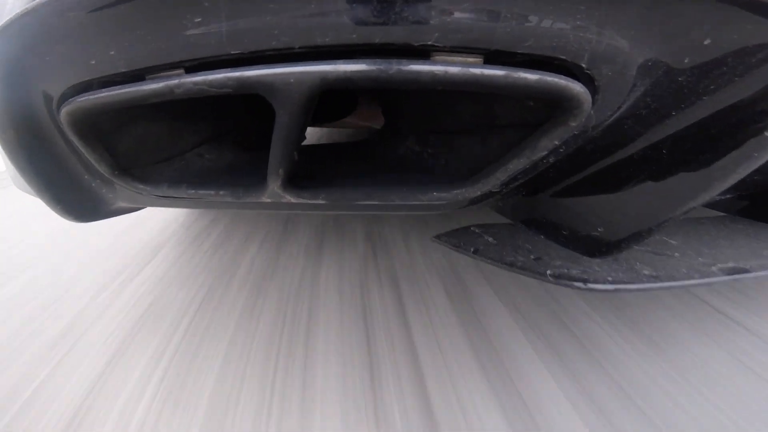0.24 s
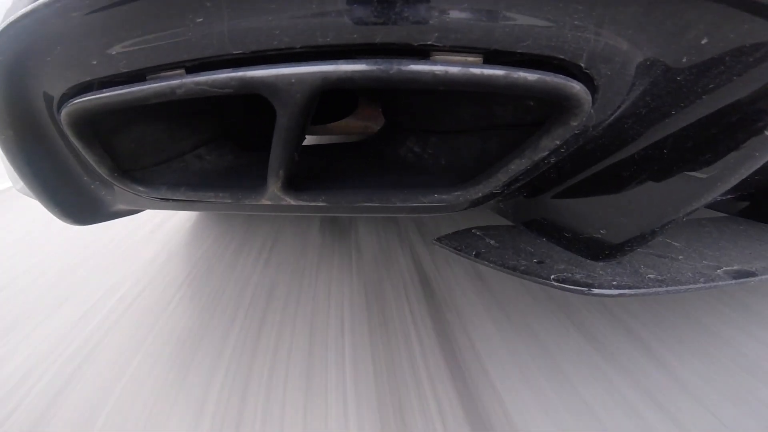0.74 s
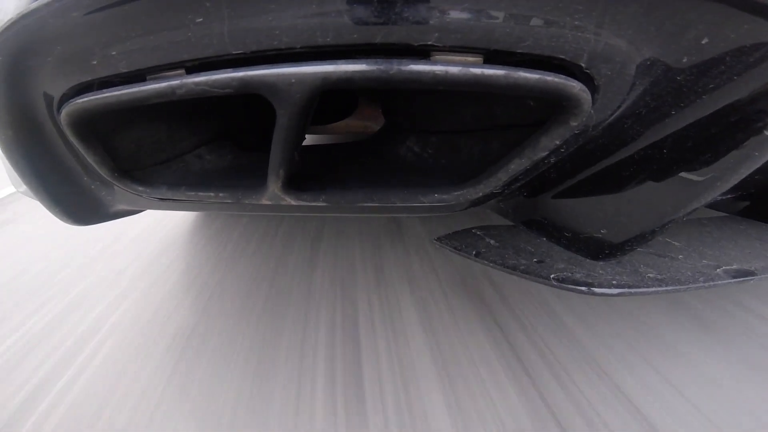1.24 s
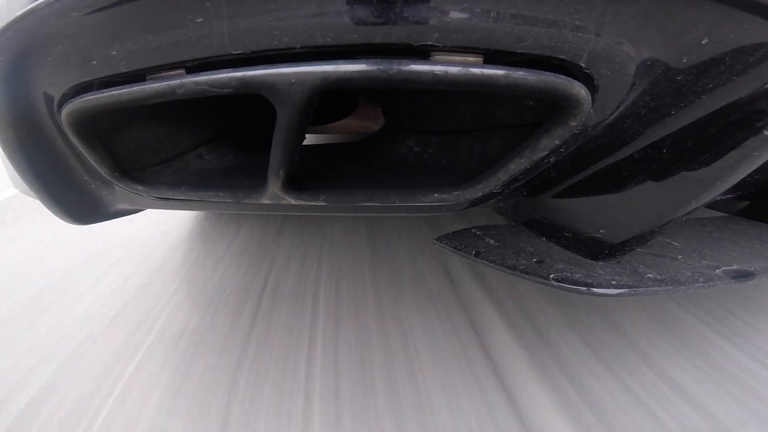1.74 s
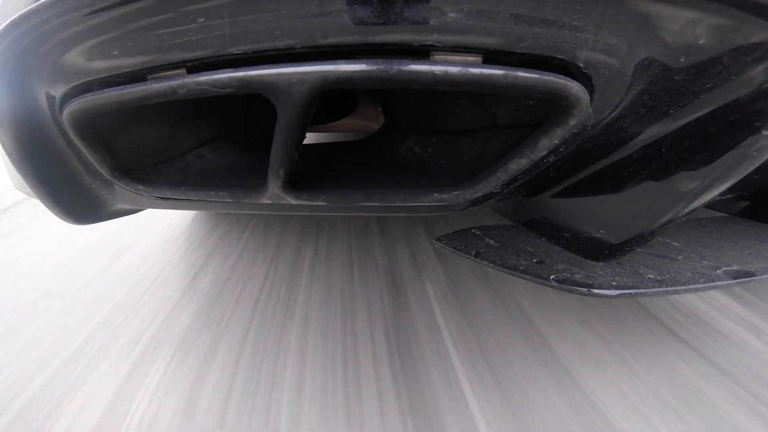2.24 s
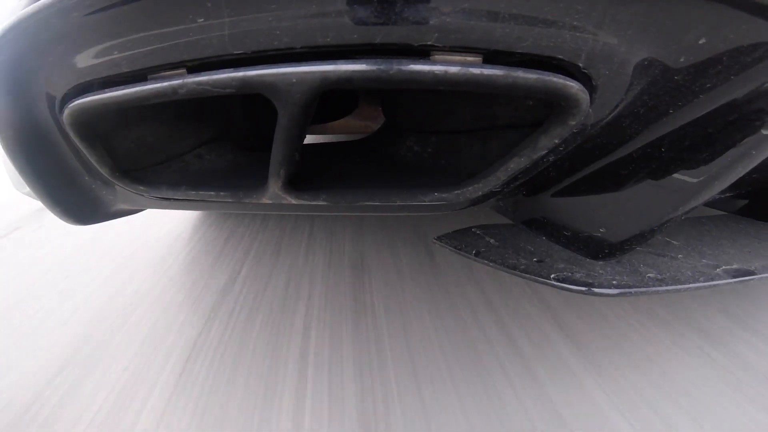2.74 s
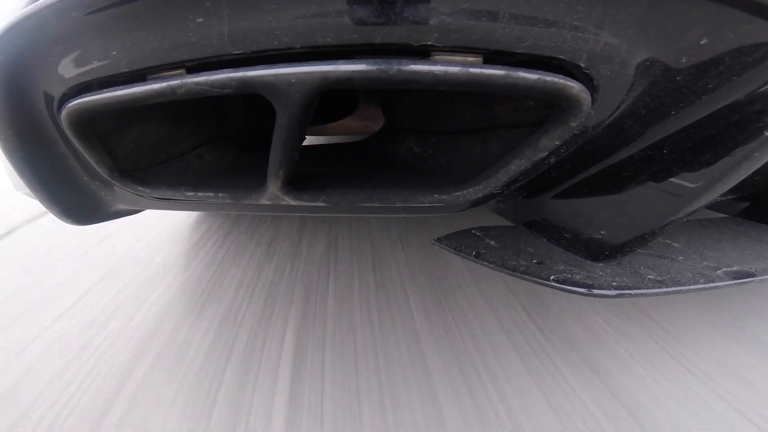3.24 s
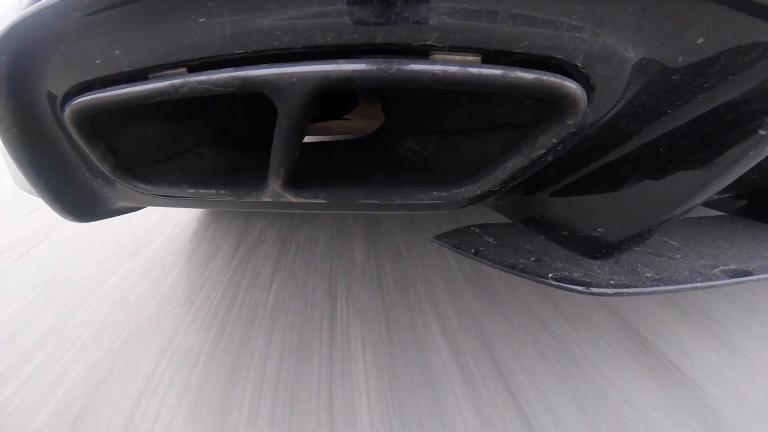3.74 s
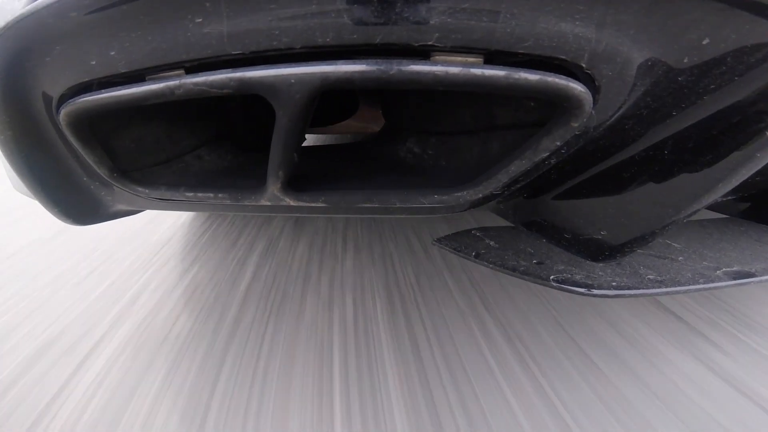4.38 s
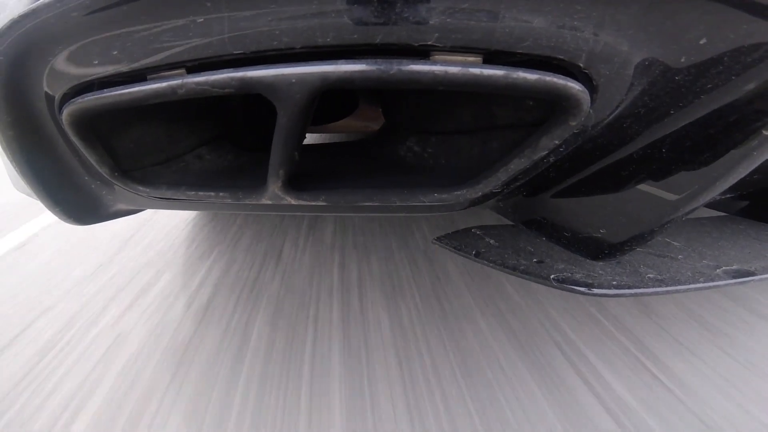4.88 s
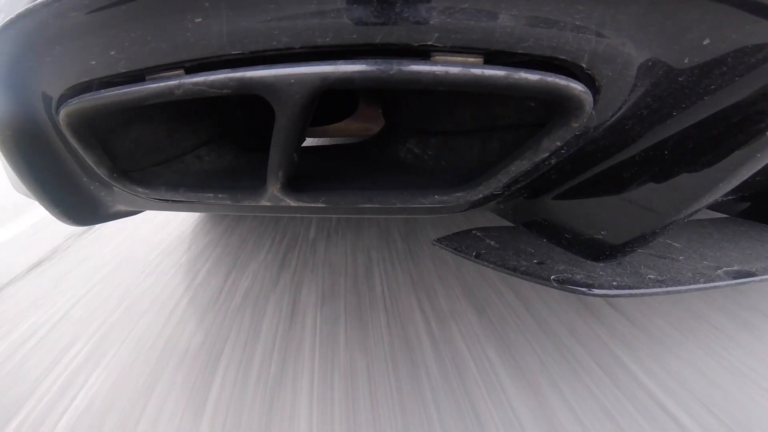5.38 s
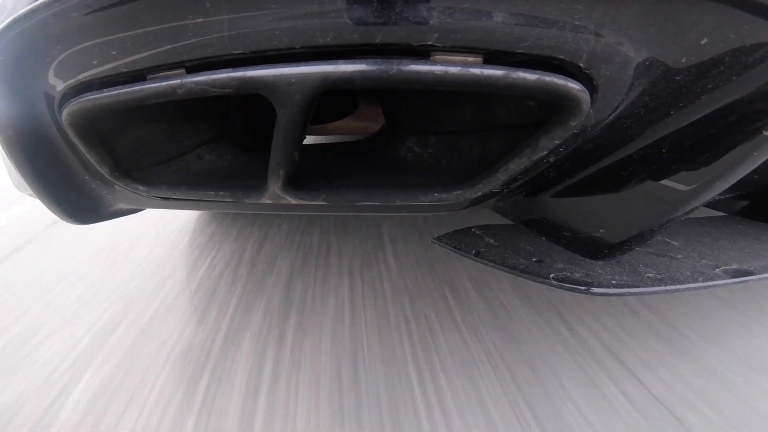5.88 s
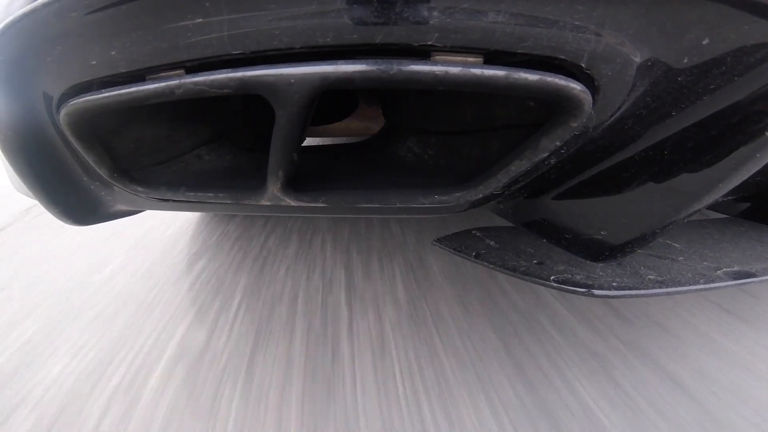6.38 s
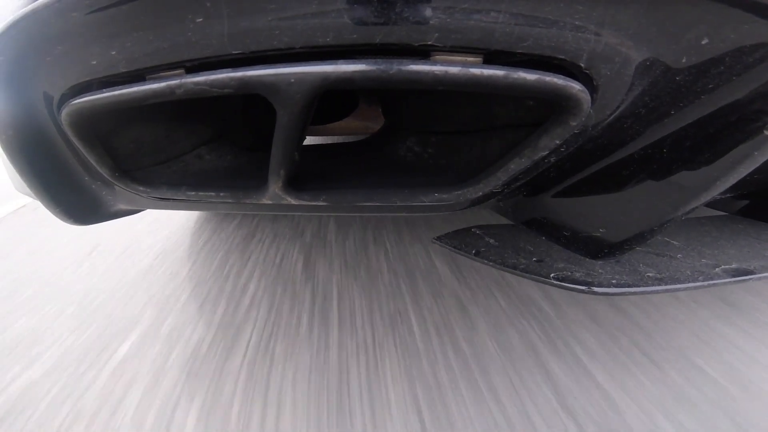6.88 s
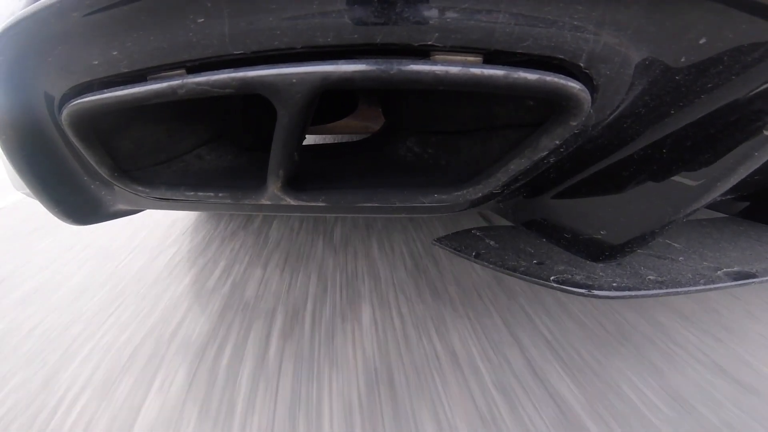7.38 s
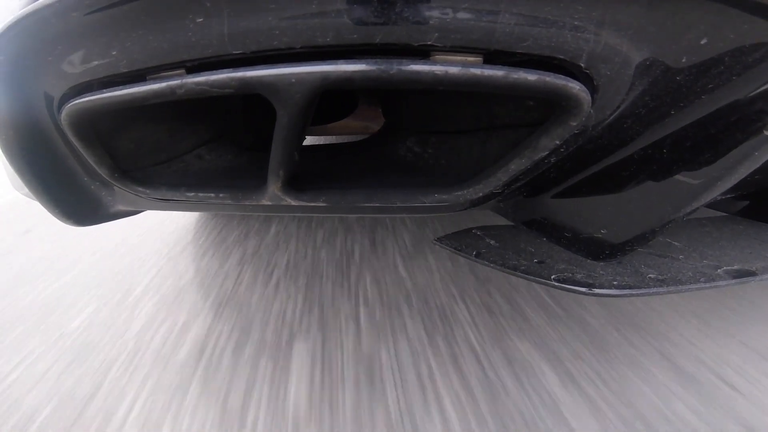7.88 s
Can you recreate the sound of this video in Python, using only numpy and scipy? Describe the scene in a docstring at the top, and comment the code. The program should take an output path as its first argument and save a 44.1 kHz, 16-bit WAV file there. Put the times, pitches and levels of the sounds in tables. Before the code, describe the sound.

A microphone on the car's rear, outdoors on the road, catches rapid exhaust crackles and bangs in the first quarter second, a brief throttle swell, then irregular muffled backfires. After that the exhaust settles into a steady resonant drone with breathy roar, strongest in the middle, its revs falling smoothly into a deep boom. Wind buffeting, soft underbody thuds and a few tiny grit ticks surround it.

```python
"""The exhaust note of a moving car, heard close behind its tailpipes, is a sum of engine orders in resonance.
Stabs of throttle open the scene: rasping pulse trains that crackle and cut off.
Unburnt fuel pops in the hot exhaust as shock trains that set damped modes ringing.
The revs then sink slowly, sliding the orders through the pipe's standing waves.
Filtered noise makes the gas roar, wind and tyres; thuds, hollow hum and ticks of grit lie around them."""
import sys
import numpy as np
from scipy import signal
from scipy.fft import rfft, irfft, next_fast_len
from scipy.io import wavfile

SR = 44100
rng = np.random.default_rng(int(sys.argv[2]) if len(sys.argv) > 2 else 0)


def inscribe(sig):
    """Save sig as 16-bit PCM at rate SR to the path in sys.argv[1].

    A 1-D sig is mono; a 2-D sig holds one channel per row.
    Samples are clipped to [-1, 1] before scaling.
    """
    pcm = np.round(np.clip(np.atleast_2d(sig).T, -1, 1) * 32767)
    wavfile.write(sys.argv[1], SR, pcm.astype(np.int16))


N = 358091
TIME = np.arange(N) / SR
FFT_SIZE = next_fast_len(N, True)
BINS = np.fft.rfftfreq(FFT_SIZE, 1 / SR)  # Hz


def amp(db):
    """Decibel law: 20 dB is a factor of ten in amplitude."""
    return 10 ** (np.asarray(db) / 20)


def unit(x):
    """Normalisation: scales a signal to rms 1."""
    return x / np.sqrt(np.mean(x ** 2) + 1e-20)


def curve(rows):
    """Linear interpolation: joins a table by straight lines in time."""
    return np.interp(TIME, *np.transpose(rows))


def read(points, hz):
    """Interpolation over log frequency: gain at the given frequencies from a short spectrum in dB."""
    at, db = np.transpose(points)
    return amp(np.interp(np.log(hz + 1), np.log(at), db))


def colour(x, gain):
    """Linear filtering: multiplies the spectrum by a gain per frequency, then scales to rms 1."""
    return unit(irfft(rfft(x, FFT_SIZE) * gain, FFT_SIZE)[:N])


def noise():
    """White noise: equal mean power at every frequency."""
    return rng.standard_normal(N)


def drift(rate_hz):
    """Slow random modulation: noise of rms 1 whose spectrum falls as a Gaussian in frequency."""
    return colour(noise(), np.exp(-(BINS / rate_hz) ** 2))


def puffs(turns, depth):
    """Amplitude modulation: turbulence that surges with each firing."""
    return noise() * (1 + depth * np.cos(2 * np.pi * turns))


def swells(rows):
    """Smooth envelopes: each row swells about its middle and fades."""
    return sum(amp(db) * np.exp(-abs((TIME - middle) / half) ** 3) for middle, half, db in rows)


def modes(table, t):
    """Modal decay: sines that each fall 60 dB in their t60."""
    return sum(amp(db - 60 * t / t60) * np.sin(2 * np.pi * hz * t) for hz, db, t60 in table)


def swing(t, hz, cycles=0.44, onset_cycles=0.088):
    """Damped oscillation: a slug of gas swings in and out a time or two."""
    turns = hz * t
    onset = 1 - np.exp(-(turns / onset_cycles) ** 2)
    return -np.sin(2 * np.pi * turns) * np.exp(-turns / cycles) * onset


def bell(x, hz, width_hz, db):
    """Resonant equalisation: raises or lowers one band of a sound."""
    numerator, denominator = signal.iirpeak(hz, hz / width_hz, fs=SR)
    return x + (amp(db) - 1) * signal.lfilter(numerator, denominator, x)


def add(mix, s, sound):
    """Superposition: mixes a sound in at time s."""
    part = mix[max(round(s * SR), 0):][:len(sound)]
    part += sound[:len(part)]


# Air buffeting the mount. Each row: time in seconds, level in dB before the common lift and gusts.
WIND = [(0, -21), (.17, -54), (.4, -35.5), (.6, -56), (.94, -33.5), (1.03, -48), (1.3, -40.5), (1.65, -45),
        (2.15, -36), (2.5, -36.5), (2.75, -40), (3.3, -44.5), (3.55, -33.5), (4.3, -34.5), (5.7, -32),
        (6.3, -34.5), (8.12, -37.5)]
# Spectrum of the wind. Each row: frequency in Hz, relative gain in dB.
BUFFET_SPECTRUM = [(10, -15), (25, -1.5), (45, -3), (80, -3), (130, -10.5), (250, -17.5), (600, -45.5),
                   (2000, -92)]
# Spectrum of the tyre wash. Each row: frequency in Hz, relative gain in dB.
TYRE_SPECTRUM = [(20, -4.5), (60, 1.5), (200, -18), (500, -18.5), (1000, -20.5), (2000, -31.5), (3000, -35),
                 (4000, -50), (6000, -57.5), (9000, -72), (16000, -80)]


def road(wind_lift_db=6.0, tyres_db=-45):
    """Broadband turbulence: lumpy wind under the bumper over the steady wash of the tyres."""
    gusts_db = 1.6 * drift(10)
    wind_level = amp(curve(WIND) + wind_lift_db + gusts_db)
    wind = wind_level * colour(noise(), read(BUFFET_SPECTRUM, BINS))
    return wind + amp(tyres_db) * colour(noise(), read(TYRE_SPECTRUM, BINS))


# Hum stirred up under the car. Each row: time in seconds, level in dB.
HOLLOW = [(0, -60), (.7, -60.5), (2, -48), (4, -46.5), (5.2, -35.5), (6.3, -37), (7.2, -41.5),
          (8.12, -45.5)]


def hollow(hz=213, width_hz=24):
    """Resonance: turbulence rings one low mode as a hollow hum."""
    resonance = 1 / (1 + (2 * (BINS - hz) / width_hz) ** 2)
    return amp(curve(HOLLOW)) * colour(noise(), resonance)


# Ticks of grit on the bodywork. Each row: time in seconds, level in dB before the low-pass filter.
GRIT = [(0.0386, -29), (1.022, -47), (1.031, -44), (2.9640, -38), (3.5100, -39), (6.7182, -31.5),
        (6.7265, -24.5)]


def grit(decay_s=0.00012, top_hz=7800):
    """Impulsive excitation: tiny dry ticks that decay with no ring."""
    out, t = np.zeros(N), np.arange(SR // 100) / SR
    low_pass = signal.butter(6, min(top_hz, SR / 3), fs=SR, output="sos")
    tick = signal.sosfilt(low_pass, np.exp(-t / decay_s))
    for s, db in GRIT:
        add(out, s, amp(db) * tick)
    return out


# Soft low thuds under the car. Each row: start in seconds, level in dB, swing rate in Hz.
THUDS = [(0.708, -25.5, 70), (0.778, -14, 85), (0.993, -29, 55), (1.683, -17, 80), (2.53, -15, 69.5),
         (2.834, -17, 110), (3.888, -18, 109), (4.179, -21, 45.2), (4.346, -16, 39.7)]


def thuds():
    """Damped oscillation: low swings of air with no crack."""
    out, t = np.zeros(N), np.arange(SR // 6) / SR
    for s, db, hz in THUDS:
        add(out, s, amp(db) * swing(t, hz, cycles=0.37))
    return out


# Brief tones of the pipe. Each row: middle in seconds, half length in seconds, level in dB.
SINGING = [(0.825, .06, -44), (0.945, .03, -42)]


def singing(hz=647, wander=0.013, flutter=.3):
    """Standing wave: one pipe mode sounds on its own, unsteady in pitch and level."""
    turns = np.cumsum(hz * (1 + wander * drift(25))) / SR
    tone = np.sqrt(2) * np.cos(2 * np.pi * turns)
    return swells(SINGING) * (1 + flutter * drift(40)) * tone


# Standing waves of the exhaust. Each row: frequency in Hz, width in Hz, peak gain in dB above no base.
PIPE = [(210, 55, -23), (323, 28.5, -3), (381, 11, -30.5), (436, 32, -28), (661, 49.4, -2.5),
        (936, 64, -30.5)]


def pipe(hz, between_db=-26):
    """Resonance: gain of the exhaust, narrow standing waves added to a weak base."""
    peaks = sum(amp(db) / (1 + (2 * (hz - centre) / width) ** 2) for centre, width, db in PIPE)
    return amp(between_db) + peaks


# Fuel smouldering in the silencer. Each row: middle in seconds, half length in seconds, level in dB.
BURBLE = [(0.772, 0.02, -42), (0.918, 0.075, -36), (1.28, 0.042, -36.5), (1.45, 0.051, -43)]


def smoulder():
    """Source strength: the envelope of burning in the silencer."""
    return swells(BURBLE)


def burble(turns, flicker_db=3.0, top_hz=1100):
    """Combustion noise: a flickering flame rings the standing waves of the pipe."""
    flame = puffs(turns, depth=0.47) * amp(flicker_db * drift(44))
    gain = pipe(BINS, between_db=-11.5) / (1 + (BINS / top_hz) ** 3)
    return smoulder() * colour(flame, gain)


# Share of the shock that the pipe end sends back (0-1), before each pop's own ringing factor.
BOUNCE = .58


def shock_train(t, shock_s=0.0011, bounce=BOUNCE, trip_s=0.00062, scatter=0.13, count=6):
    """Multiple reflection: a shock bounces along the tailpipe, weaker and rounder at each return."""
    trips_s = trip_s * (1 + 2 * scatter * (rng.random(count) - .5))
    arrivals = np.cumsum(np.r_[0, trips_s])
    train = np.zeros(len(t))
    for k, at in enumerate(arrivals):
        age = np.maximum(t - at, 0)
        rise = 1 - np.exp(-age * SR / (1 + k))
        train += bounce ** k * rise * (1 - age / shock_s) * np.exp(-age / shock_s)
    return train


# Fuel igniting in the exhaust. Each row: start in seconds, relative crack level in dB, low-pass limit in Hz,
# mean round trip of the shock in seconds, ringing factor, relative thump level in dB, swing of the gas in Hz,
# favoured frequency in Hz, its boost in dB (a negative boost is a cut).
POPS = [(0.0095, -17.5, 1200, 0.0015, 0.82, -6, 500, 600, 3),
        (0.013, -30, 2600, 0.00089, 0.91, -26, 100, 2000, 4),
        (0.0207, -16, 2200, 0.0012, 1.1, -24, 170, 700, 7),
        (0.0298, -14, 3800, 0.00051, 0.87, -9, 151, 3200, 7),
        (0.0347, -17, 2800, 0.00094, 1, -26, 90, 1900, 3),
        (0.0487, -23, 3000, 0.0014, 0.81, -18, 65, 900, -4),
        (0.0648, -9.5, 2300, .001, 0.7, -27, 60, 1600, 6), (0.07, -22, 2200, .001, .8, -32, 70, 1300, 2),
        (0.091, -9, 4600, 0.00062, 0.63, -14.5, 65, 1000, 3),
        (0.1075, -3, 8850, 0.00101, 0.64, -32, 52, 703, 8),
        (0.1344, -7, 9450, 0.00059, 0.93, -16, 50, 3150, 10),
        (0.1518, -5, 8000, 0.0012, 1.07, -21, 50, 4900, 5),
        (0.1827, -8, 7040, 0.00098, 0.95, -15, 65, 1650, 7),
        (0.196, -18, 4600, 0.0005, 1.6, -11, 86.6, 402, 17),
        (0.2085, -20, 5500, 0.00061, 0.83, -30, 80, 400, 9),
        (0.215, -18, 3400, 0.00056, 1, -16.5, 65, 450, 14),
        (0.418, -23, 3600, 0.00095, .8, -22, 91, 1400, 1),
        (0.889, -24, 5500, .0007, 0.98, -29, 70, 400, 17), (0.896, -25, 3000, 0.0014, 1, -19, 25, 480, 3),
        (0.924, -37, 6000, .0007, .8, -24, 60, 910, 3), (0.936, -39, 5500, .0007, .8, -23, 40, 400, 2),
        (0.959, -26, 1200, 0.00085, 1.6, -30, 70, 343, 15),
        (1.081, -20, 3300, 0.00047, 1.6, -11, 34.5, 1300, 11),
        (1.0913, -3, 3050, 0.00088, 0.79, -24, 69.4, 2700, 4),
        (1.1404, -15, 2900, 0.0011, 1.45, -35, 61, 480, -3),
        (1.15, -28, 1200, .0014, 2.7, -15.5, 52, 480, 9),
        (1.237, -12.5, 2330, 0.0011, 1.23, -21, 40, 700, 7.5),
        (1.256, -19, 1510, 0.0019, 1, -18, 60, 650, 4), (1.2647, -14.5, 2290, .0014, 1.07, -18, 55, 650, 8),
        (1.3755, -16.5, 2830, 0.0013, 1.8, -24, 42, 880, 7),
        (1.3959, -11.5, 3320, 0.00084, 1.1, -17.5, 38, 1310, 13),
        (1.3972, -21.5, 3000, 0.00032, 1.4, -32, 38.2, 2300, 16.5),
        (1.435, -23, 2600, 0.001, 1.2, -29, 50, 2200, 3),
        (1.4461, -10.5, 1900, 0.0015, 1.24, -18, 37.7, 710, 5.5)]
# Low modes a pop sets ringing. Each row: frequency in Hz and t60 in seconds around level in dB, in the order
# frequency, level, t60; heat scales the frequency, and the ringing factor the t60.
THUMP_MODES = [(114.5, -9.5, 0.067), (202, -22.5, 0.085), (330, -10, 0.034)]
# Higher modes a pop sets ringing, scaled likewise. Each row: frequency in Hz, level in dB, t60 in seconds.
RING_MODES = [(657, -8, 0.038), (857, -5, 0.012), (1120, -17.5, 0.027), (1340, -21, 0.044),
              (1680, -14.5, 0.013), (2224, -20.5, 0.026), (2800, -18, 0.011), (3100, -27, 0.015),
              (4820, -26.5, 0.015)]
# Gaps between the resonances of a pop. Each row: frequency in Hz, width in Hz, gain in dB.
GAPS = [(504, 126, -9.5), (3970, 420, -10)]


def pops(sizzle=0.084, sizzle_s=0.003, clatter=.45, clatter_s=0.0064, clatter_hz=2600,
         favoured_width=0.11, crack_db=-6.5, thump_db=2, hiss_db=-17, hiss_s=0.0044):
    """Shock excitation: a shock train rings modes, sizzles and clatters; gas swings back and hisses."""
    out, t = np.zeros(N), np.arange(SR // 6) / SR
    underbody = signal.butter(2, [600, clatter_hz], "band", fs=SR, output="sos")
    mouth = signal.butter(3, [3000, 7500], "band", fs=SR, output="sos")
    for s, db, bright_hz, trip_s, length, low_db, swing_hz, favoured_hz, boost_db in POPS:
        flame, echoes, jet = rng.standard_normal((3, len(t)))
        heat = 1 + 0.04 * (rng.random() - .5)  # hotter gas rings higher
        heated = [(hz * heat, level, t60 * length) for hz, level, t60 in THUMP_MODES + RING_MODES]
        burst = shock_train(t, bounce=min(BOUNCE * length, .85), trip_s=trip_s)
        burst += length * modes(heated, t)
        burst += sizzle * flame * np.exp(-t / sizzle_s)
        dying_echoes = echoes * np.exp(-t / (clatter_s * length))
        burst += clatter * signal.sosfilt(underbody, dying_echoes)
        for band in GAPS + [(favoured_hz, favoured_hz * favoured_width, boost_db)]:
            burst = bell(burst, *band)
        muffler = signal.butter(5, min(bright_hz, SR / 3), fs=SR, output="sos")
        crack = amp(db + crack_db) * signal.sosfilt(muffler, burst)
        thump = amp(low_db + thump_db) * swing(t, swing_hz)
        hiss = signal.sosfilt(mouth, jet) * t / hiss_s * np.exp(1 - t / hiss_s)
        hiss_level = amp(hiss_db + 3 * low_db)  # grows with the cube of the swing
        add(out, s, crack + thump + hiss_level * hiss)
    return out


# Release of a stab in dB per second: the rasp dies quickly and the loaded tones linger.
RASP_RELEASE, TONE_RELEASE = 185, 62
# Stabs of throttle. Each row: start in seconds, rise in seconds, time from start to release in seconds,
# level in dB.
THROTTLE = [(0, 0.001, 0.045, -21), (0.172, 0.19, 0.28, -30.7)]


def throttle(release=RASP_RELEASE):
    """Attack and exponential release: each stab swells, holds and dies away."""
    total = np.zeros(N)
    for s, rise, length, db in THROTTLE:
        swell = np.sqrt(np.clip((TIME - s) / (abs(rise) + 1 / SR), 0, 1))
        total += swell * amp(db - release * np.maximum(TIME - s - length, 0))
    return total


def crackle(snaps_per_s=220, throttle_db=-15, smoulder_db=-23, spread_db=4, top_hz=3500):
    """Random impulses: small snaps ring the tailpipe under throttle and while fuel smoulders."""
    t = np.arange(SR // 20) / SR
    sizes = amp(spread_db * np.minimum(rng.exponential(1, N), 2))
    snaps = (rng.random(N) < snaps_per_s / SR) * sizes
    low_pass = signal.butter(2, min(top_hz, SR / 3), fs=SR, output="sos")
    snap = signal.sosfilt(low_pass, shock_train(t) + modes(RING_MODES, t))
    strength = amp(throttle_db) * throttle() + amp(smoulder_db) * smoulder()
    return strength * unit(signal.oaconvolve(snaps, snap)[:N])


def ripple(ripple_db=2.0, from_hz=2500, count=24):
    """Comb interference: late silencer echoes make many narrow peaks, strongest in the treble."""
    delays_s = rng.uniform(.004, .025, count)
    hz = np.arange(0, SR / 2, 2)
    comb = unit(sum(np.cos(2 * np.pi * hz * delay) for delay in delays_s))
    treble = BINS ** 2 / (BINS ** 2 + from_hz ** 2)
    return amp(ripple_db * np.interp(BINS, hz, comb) * treble)


# Gas streaming from the pipes, driving note, overtones and roar. Each row: time in seconds, strength in dB.
FLOW = [(0, -71), (.4, -50.5), (.64, -52.5), (.85, -48), (1.2, -44.5), (1.65, -41.5), (2.6, -36.5),
        (3.9, -34.5), (5.55, -34.5), (6.6, -39.5), (6.85, -42), (8.12, -42.5)]


def flow():
    """Source strength: the amplitude of the gas stream."""
    return amp(curve(FLOW))


# The firing drops out or dips. Each row: middle in seconds, half length in seconds, gain change in dB.
CUTS = [(0.13, 0.074, -24), (0.71, 0.057, -6.5), (1.139, 0.025, -7), (1.21, 0.063, -7), (1.334, 0.045, -5),
        (1.488, 0.031, -6.5)]


def ignition():
    """Gating: gain of the firings, near 1 except while they drop out."""
    return amp(sum(depth_db * np.exp(-((TIME - middle) / half) ** 4) for middle, half, depth_db in CUTS))


# Spectrum of the gas before the pipe colours it. Each row: frequency in Hz, relative gain in dB.
ROAR_SPECTRUM = [(60, 7.5), (130, 8), (260, 4), (400, 2.5), (540, -2.5), (800, 0), (1150, 3), (1500, -1.5),
                 (2000, -11), (2750, -16.5), (3800, -29.5), (5000, -34.5), (5600, -40.5), (7000, -46.5),
                 (10000, -73)]
# Brief surges of the roar's body. Each row: middle in seconds, half length in seconds, boost in dB.
SURGES = [(2.86, 0.023, 2), (3.902, 0.016, 5.5)]


def roar(turns, level_db=6, throttle_db=-21, ring=1.8, flutter_db=0.66, cut_share=.1, surge_hz=1700):
    """Jet noise: streaming gas, partly coloured by pipe resonance, flutters in the slipstream."""
    gain = read(ROAR_SPECTRUM, BINS) * ripple() * np.sqrt(1 + ring * pipe(BINS))
    gas = colour(puffs(turns, depth=0.061), gain)
    surge = amp(sum(db * np.exp(-((TIME - middle) / half) ** 2) for middle, half, db in SURGES))
    body = colour(gas, 1 / (1 + (BINS / surge_hz) ** 4))
    gas = gas + (surge - 1) * body
    strength = np.hypot(flow() * ignition() ** cut_share, amp(throttle_db) * throttle())
    return strength * amp(level_db + flutter_db * drift(45)) * gas


# Spectrum of the rasp under throttle. Each row: frequency in Hz, relative gain in dB.
RASP_SPECTRUM = [(30, -6), (130, 7), (260, 0.5), (400, 1), (560, -8.5), (740, -3), (1100, -24),
                 (2000, -18.5), (2600, -21), (3300, -26.5), (3700, -35), (6000, -42.5), (9000, -57),
                 (14000, -80)]


def rasp(turns, rough=.6, surge=.75, uneven=1.0, level_db=0.0, count=40):
    """Harmonic series plus turbulence: each firing is a pulse smeared in phase and a puff of gas."""
    pulses = sum(np.cos(2 * np.pi * (k * turns + rng.random())) / k ** 0.048 for k in range(1, count))
    pulses = pulses * (1 + uneven * drift(77))
    gas = colour(puffs(turns, depth=surge), BINS < SR / 4)
    drive = (1 - rough) * unit(pulses) + rough * gas
    return amp(level_db) * throttle() * colour(drive, read(RASP_SPECTRUM, BINS) * ripple())


# Revs between which the order levels are blended, in firings per second.
LOW_REVS, HIGH_REVS = 95, 135
# Fractional orders are silent until this start, then rise over this time, in seconds.
UNEVEN_FROM_S, UNEVEN_RISE_S = 1.35, .2
# Uneven cylinders add half and quarter orders. Each row: multiple of the firing rate, level in dB at high
# revs, level in dB at low revs, both before the pipe's gain.
ORDERS = [(2.0, 1.5, -2), (2.25, -15, -18), (2.5, -9, -9), (2.75, -27, -26), (3.0, 1.5, 0.5),
          (3.5, -13.5, -11.5), (3.75, -15.5, -11), (4.0, -7.5, -10.5), (4.25, -22.5, -19),
          (4.5, -13.5, -14.5), (5.0, -7.5, -7.5), (5.5, -10.5, -15.5), (6.0, -8, -8), (6.25, -19.5, -21),
          (6.5, -17.5, -18.5), (7.0, -7, -9), (7.25, -24.5, -26.5), (7.5, -11.5, -12), (7.75, -19.5, -24),
          (8.0, -9.5, -10), (8.5, -21, -18.5), (9.0, -16, -11), (9.5, -13.5, -16)]
# Whole orders of even firing under throttle. Each row: multiple of the firing rate, dB above the throttle.
LOADED = [(1, -13.5), (2, -12), (3, -18.5), (4, -18), (5, -24), (6, -27)]
# The note booms as it sinks into the exhaust's lowest range. Each row: frequency in Hz, dB above the flow.
BOOM = [(82, 25), (90, 24.5), (95.5, 22), (100, 25), (106, 22.5), (115, 17), (138, 12.5), (154, 7.5)]
# Overtones come forward as revs sink. Each row: firings per second, drive in dB above the flow.
OVERTONES = [(82, 18), (128, 17), (138, 15), (146, 14), (154, 13.5)]


def drone(rate, turns, waver=0.0098, overtone_waver=0.12, loaded_waver=.28, smoulder_db=3):
    """Engine orders in resonance: each overtone swells as it slides through a standing wave."""
    note = flow() * read(BOOM, rate) * (1 + waver * drift(44)) * np.cos(2 * np.pi * turns)
    overtones = np.zeros(N)
    unsteady = [1 + overtone_waver * drift(14) for _ in range(4)]  # shared among the orders in turn
    revs = np.clip((rate - LOW_REVS) / (HIGH_REVS - LOW_REVS), 0, 1)
    uneven = np.clip((TIME - UNEVEN_FROM_S) / UNEVEN_RISE_S, 0, 1)
    for i, (k, high_db, low_db) in enumerate(ORDERS):
        level = amp(low_db + (high_db - low_db) * revs) * pipe(k * rate)
        set_in = uneven if k % 1 else 1
        order = np.cos(2 * np.pi * (k * turns + rng.random()))
        overtones += set_in * level * unsteady[i % len(unsteady)] * order
    drive = np.hypot(flow() * read(OVERTONES, rate), amp(smoulder_db) * smoulder())
    loaded = np.zeros(N)
    for k, db in LOADED:
        order = np.cos(2 * np.pi * (k * turns + rng.random()))
        loaded += amp(db) * (1 + loaded_waver * drift(35)) * order
    loaded *= throttle(TONE_RELEASE)
    return np.sqrt(2) * ignition() * (note + drive * overtones + loaded)


# Engine speed before a slight random wander. Each row: time in seconds, firings per second.
FIRING = [(0, 138), (.2, 147), (.4, 150), (.55, 147), (.9, 151.7), (1.45, 153.4), (1.85, 149.4),
          (2.4, 146.3), (3, 141.2), (3.75, 135.9), (4.6, 132.7), (5.12, 128.7), (6, 113.5), (6.9, 97.4),
          (8.12, 82.3)]


def scene():
    """Superposition: one firing phase times drone, rasp, roar and burble; the rest is independent."""
    rate = curve(FIRING) * (1 + 0.00085 * drift(11.2))
    turns = np.cumsum(rate) / SR  # firings so far
    background = road() + hollow() + grit() + thuds()
    fuel = singing() + burble(turns) + pops() + crackle()
    engine = roar(turns) + rasp(turns) + drone(rate, turns)
    return (background + fuel + engine)[None]


def record(dry, ceiling=0.6, edge_hz=15000):
    """Band limiting and soft saturation: the microphone drops deep rumble, rounds peaks and cuts treble."""
    dry = signal.sosfilt(signal.butter(2, 18, "high", fs=SR, output="sos"), dry)
    dry = dry / (1 + (dry / ceiling) ** 8) ** (1 / 8)
    dry = dry * signal.windows.tukey(N, .001)  # soft ends
    low_pass = signal.firwin(255, edge_hz, window=("kaiser", 9), fs=SR)
    return signal.oaconvolve(dry, low_pass[None], "same")


dry = scene()
out = record(dry)
inscribe(out)
```